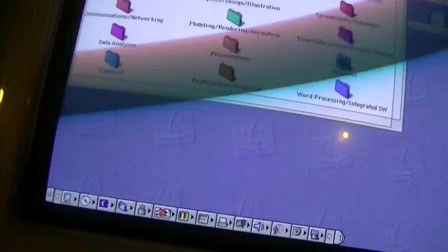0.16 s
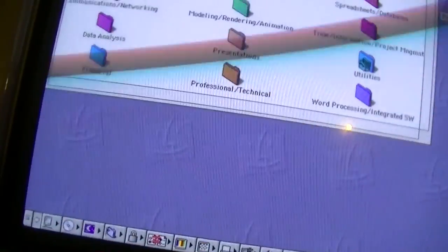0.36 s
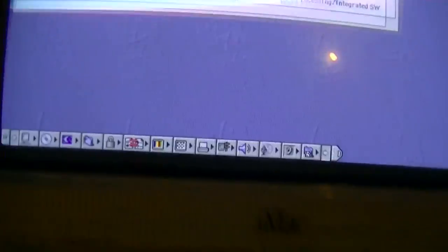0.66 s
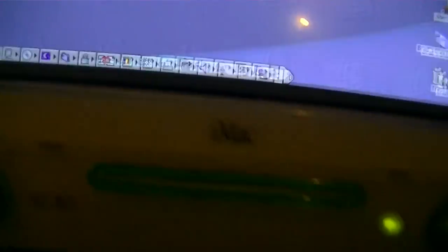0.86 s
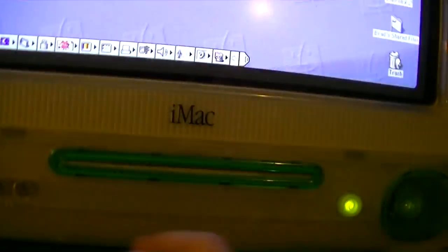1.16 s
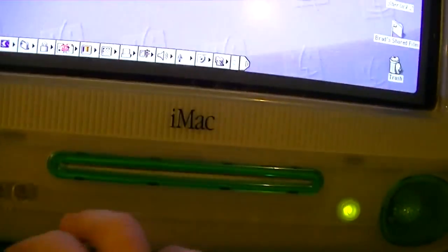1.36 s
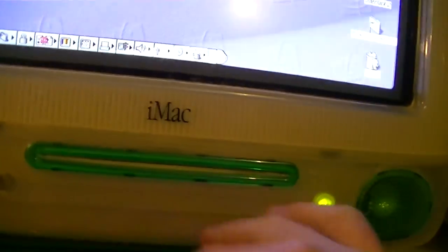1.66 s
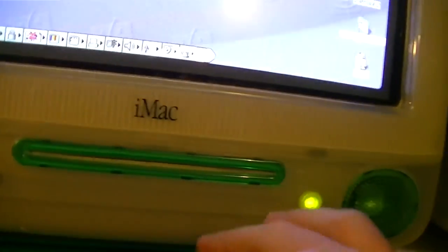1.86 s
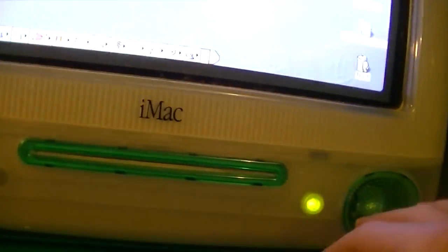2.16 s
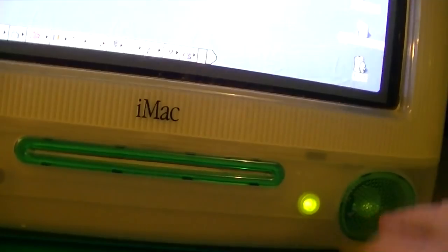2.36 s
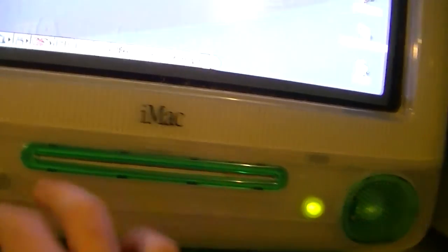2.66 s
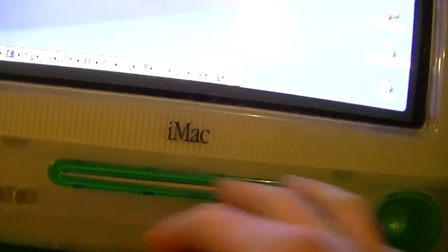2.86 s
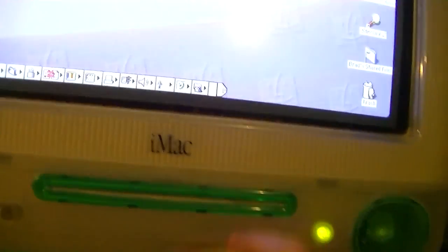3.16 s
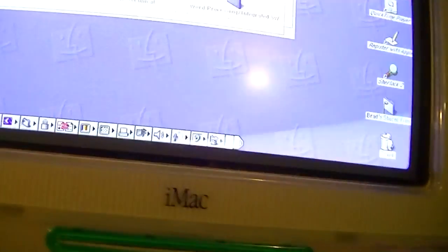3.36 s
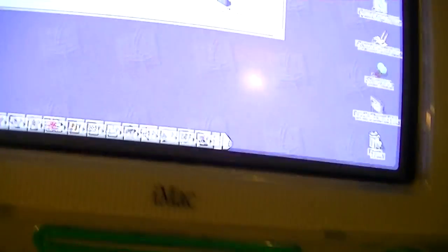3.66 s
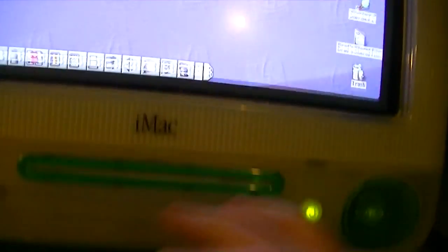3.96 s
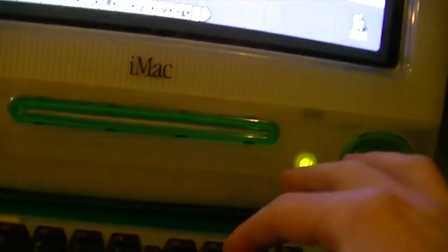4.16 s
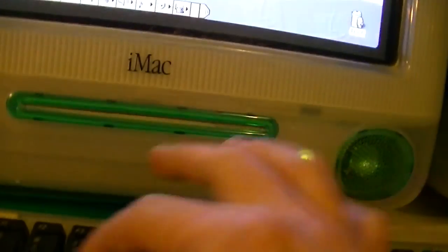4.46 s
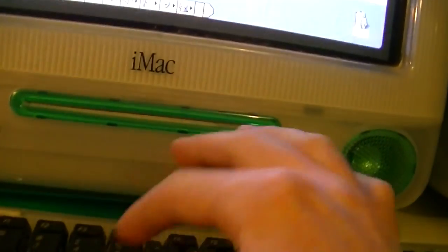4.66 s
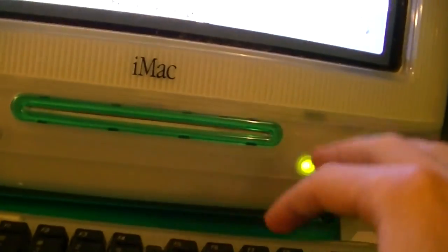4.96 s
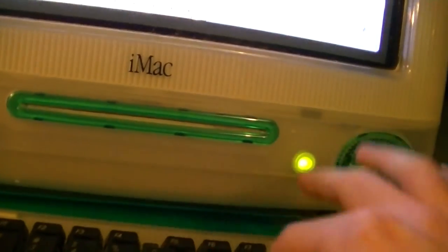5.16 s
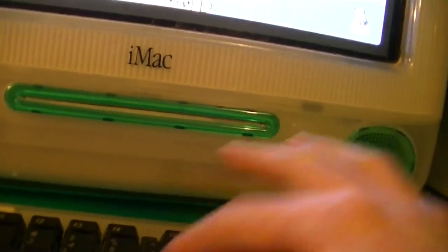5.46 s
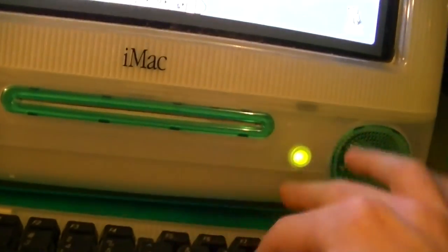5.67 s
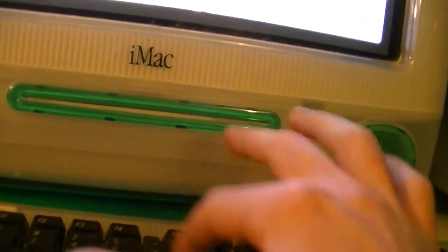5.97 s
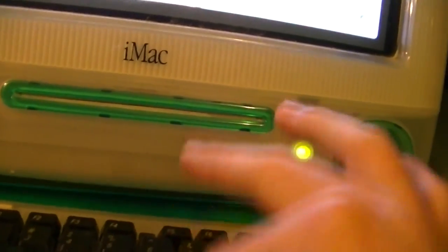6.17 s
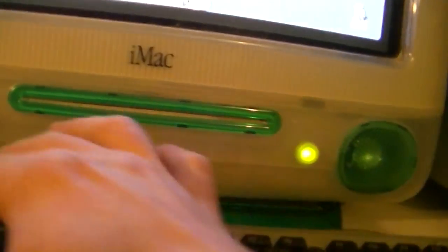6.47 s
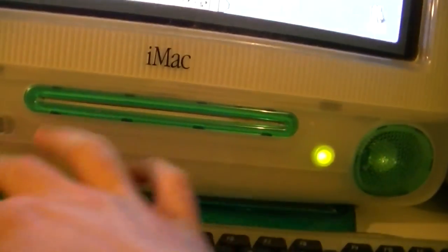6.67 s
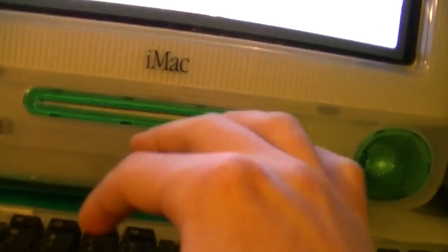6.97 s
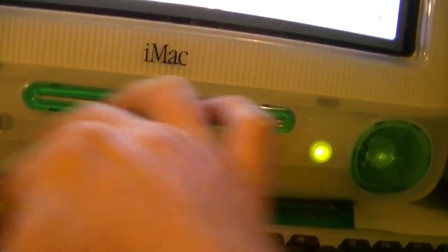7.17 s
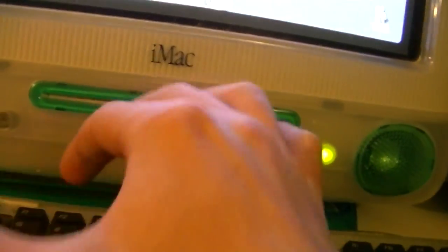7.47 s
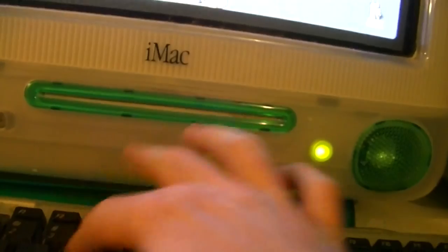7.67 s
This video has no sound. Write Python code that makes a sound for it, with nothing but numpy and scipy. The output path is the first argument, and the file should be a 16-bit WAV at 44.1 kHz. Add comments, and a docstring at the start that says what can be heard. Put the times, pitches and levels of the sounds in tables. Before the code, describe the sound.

A hand-held camera is knocked and brushed for the first half second, with a faint hollow hiss. After a pause one soft key click sounds, then louder single clicks, settling into steady one-handed typing at three or four keys a second. Each key clicks down and more softly back up. A soft airy rush and thin high drive whine continue beneath, in a quiet small room, microphone close.

```python
"""A quiet room: someone pecks at a desktop keyboard with one hand, close to a hand-held camera.
Each key clicks (damped cap modes, shaped noise), thumps case and desk (more modes), and clicks back up.
At first the moving camera is bumped and brushed: noise bursts, swelling noise and a gliding band of hiss.
Under it all are a soft rush of coloured noise and the high whine of a spinning drive, built of sines."""
import sys
import numpy as np
from scipy import signal
from scipy.fft import rfft, irfft, next_fast_len
from scipy.io import wavfile
from scipy.ndimage import map_coordinates

SR = 44100
rng = np.random.default_rng(int(sys.argv[2]) if len(sys.argv) > 2 else 0)


def digitize_waveform(pressure):
    """Quantize a signal to 16-bit integers and store it at the path in sys.argv[1].

    Rows of a 2-D input are taken as channels; values are limited to [-1, 1].
    """
    field = np.atleast_2d(pressure).T
    bounded = np.clip(field, -1, 1)
    quanta = np.round(bounded * 32767).astype(np.int16)
    wavfile.write(sys.argv[1], SR, quanta)


N = 344421

# keys going down: t/s, level/dB, cap pitch f/Hz, crack level/dB (relative),
# offset of the lighter contact t/s (negative: before), desk thump level/dB (before its trim)
KEY_PRESSES = [(1.3472, -32, 1370, -13.5, .015, -55), (2.3655, -22, 2200, -12.5, -.0038, -52.5),
               (2.6538, -24.5, 1050, -10, -0.0031, -47.5), (3.1442, -26, 1960, -13.5, .0046, -50),
               (3.5482, -22, 2450, -18.5, 0.00015, -53.5), (3.8345, -22, 1934, -19.5, 0.0023, -53),
               (4.2583, -22.5, 1700, -21, 0.0068, -55.5), (4.4988, -20.5, 2300, -12, -.003, -49),
               (4.7224, -19.5, 2525, -18, 0.0042, -49), (5.068, -17, 2060, -13.5, 0.0074, -50.5),
               (5.3299, -18.5, 2560, -16, -0.0033, -48.5), (5.5829, -24.5, 2550, -16, 0.0017, -51),
               (5.8121, -23.5, 2335, -19.5, .0042, -53), (5.961, -24, 1940, -15, 0.00069, -53.5),
               (6.1522, -20.5, 1872, -5, 0.005, -43.5), (6.5881, -20, 1600, -13, -0.00078, -43.5),
               (7.0278, -20.5, 1840, -18.5, 0.0082, -50), (7.2233, -17, 2060, -14, -0.0028, -44.5),
               (7.5784, -20, 2520, -11, -0.0037, -48)]
# colour of loose, rubbing key parts: f/Hz, relative level/dB per Hz
RATTLE_COLOUR = [(100, -45.5), (400, -5), (750, 1.5), (1800, 3.5), (2700, -3), (3600, -7), (4400, -9),
                 (5200, -16), (6500, -20), (8600, -20), (15000, -36)]
# balance inside a stroke, level/dB: ring of the cap, clack of the shell, rub of the stem
# a rising key rubs more
PRESS_TONE, RELEASE_TONE = (-5.5, -5, -25), (-5, -6, -18)


def amp(db):
    """Decibels to gain."""
    return 10 ** (np.asarray(db) / 20)


def unit(x):
    """Scale x to rms 1."""
    return x / np.sqrt(np.mean(x ** 2) + 1e-20)


def along(points, hz):
    """Read (f/Hz, value) points on a log frequency axis."""
    f, v = np.transpose(points)
    return np.interp(np.log(hz + 1), np.log(f + 1), v)


def curve(rows):
    """Turn (t/s, value) rows into one value per sample."""
    return np.interp(np.arange(N) / SR, *np.transpose(rows))


def wobble(rate):
    """Smooth random curve with rate knots a second, updated every 64 samples."""
    knots = rng.standard_normal(int(N * rate / SR) + 4)
    positions = np.arange(0, N + 64, 64) * rate / SR
    return map_coordinates(knots, [positions]).repeat(64)[:N]


def filtered(x, gain):
    """Filter a full-length sound with a gain that depends on frequency."""
    m = next_fast_len(N + SR // 2)
    spectrum = rfft(x, m) * gain(np.fft.rfftfreq(m, 1 / SR))
    return irfft(spectrum, m)[..., :N]


def coloured(x, colour):
    """Give a short sound a colour through a causal, minimum-phase filter."""
    n = 2 * len(x)
    gain = amp(along(colour, np.fft.rfftfreq(n, 1 / SR)))
    # folding the cepstrum forward in time makes the filter causal
    cepstrum = irfft(np.log(gain))
    cepstrum[1:n // 2] *= 2
    cepstrum[n // 2 + 1:] = 0
    return irfft(rfft(x, n) * np.exp(rfft(cepstrum)))[:len(x)]


def sized(x, span):
    """Scale a hit to the energy of rms 1 over span seconds."""
    return x * np.sqrt(span * SR / np.sum(x ** 2))


def burst(t, rise, t60):
    """Noise that swells quickly and dies away."""
    swell = 1 - np.exp(-t / rise)
    return rng.standard_normal(len(t)) * swell * amp(-60 * t / t60)


def ring(t, modes, rise, scatter_db, detune):
    """Damped modes (f/Hz, level/dB, t60/s), with new strengths and tunings at each strike."""
    out = np.zeros(len(t))
    for hz, db, t60 in modes:
        phase = 2 * np.pi * (hz * (1 + detune * rng.normal()) * t + rng.random())
        out += amp(db + scatter_db * rng.normal() - 60 * t / t60) * np.sin(phase)
    return out * (1 - np.exp(-(t / rise) ** 2))


def add(track, s, sound):
    """Mix a sound into the track at s seconds."""
    part = track[round(s * SR):][:len(sound)]
    part += sound[:len(part)]


def air(air_db=1.5):
    """A soft, nearly steady rush of noise, peaked by resonances of the housing."""
    # broad colour: f/Hz, relative level/dB per Hz
    air_colour = [(60, -30), (120, -20), (260, -11), (370, -8), (450, 0), (700, 1), (1000, 0), (1400, -2),
                  (2300, -7), (4600, -10), (6500, -18), (10500, -17), (12000, -25), (16000, -32)]
    # housing resonances: f/Hz, width f/Hz, boost level/dB
    housing = [(820.5, 140, 11.5), (1158, 65, 10), (1707, 160, 8.5), (8400, 3300, 9)]
    # slow drift: t/s, level/dB (before air_db)
    drift = [(0.0, -57.5), (3.55, -59), (7.81, -58.5)]

    def gain(hz):
        peaks_db = sum(db / (1 + (2 * (hz - centre) / width) ** 2) for centre, width, db in housing)
        return amp(along(air_colour, hz) + peaks_db)

    rush = unit(filtered(rng.standard_normal(N), gain))
    return amp(curve(drift) + air_db) * rush


def drive(whine_db=3, fade_db=3, buzz_db=-68, spread_db=7, spin_hz=70.62):
    """The drive's tones swell and fade as the camera moves through their standing waves."""
    # tones: f/Hz, level/dB with the camera at the screen, level/dB at the keys (both before whine_db)
    tones = [(1342, -73, -74), (1412, -75, -69), (2013, -68, -76), (2083, -69, -73), (2614, -68, -71),
             (2684, -75, -71), (3284, -79, -73), (3354, -67, -72), (4026, -69, -78), (4517, -76, -79),
             (4695, -76, -79), (7381, -82, -80), (8052, -70, -69), (8400, -78, -77), (8652, -71, -71),
             (8722, -69, -68), (8792, -80, -76), (9323, -75, -77), (9393, -73, -75), (9463, -73, -73),
             (10134, -81, -77), (10665, -85, -81)]
    t = np.arange(N) / SR
    lowered = curve([(2.2, 0), (4.3, 1)])  # camera position: 0 at the screen, 1 at the keys
    out = np.zeros(N)
    for hz, screen_db, keys_db in tones:
        fading = unit(amp(fade_db * wobble(1.98)))
        level = amp(whine_db + screen_db + (keys_db - screen_db) * lowered) * fading
        phase_drift = .5 * wobble(1.93)
        out += level * np.sin(2 * np.pi * (hz * t + rng.random()) + phase_drift)

    # the bearing adds a row of faint, narrow noise lines, one spin rate apart
    strength = amp(spread_db * np.clip(rng.standard_normal(SR), -1.5, 1.5))
    # f/Hz, relative level/dB
    colour = [(900, -31), (2200, 6), (4600, 1), (6000, 0), (8500, -14), (11500, -2.5), (15000, -18.5)]

    def lines(hz):
        comb = np.exp(-(hz % spin_hz - spin_hz / 2) ** 2)
        return comb * strength[(hz // spin_hz).astype(int)] * amp(along(colour, hz))

    buzz = unit(filtered(rng.standard_normal(N), lines))
    return out + amp(buzz_db) * buzz


def rub_envelope(attack_s=0.013, t60_s=0.12):
    """Each brush over the camera body swells, holds for its length and dies away."""
    # brushes: t/s, length t/s, level/dB
    rubs = [(0.18, 0.01, -50), (.308, 0.012, -48), (.35, 0.01, -44.5), (.386, 0.035, -39.5),
            (0.497, .035, -54.5), (.57, .13, -57.5)]
    t = np.arange(N) / SR
    out = np.zeros(N)
    for s, length, db in rubs:
        swell = np.clip(1 + (t - s) / attack_s, 0, 1) ** 2
        decay_db = -60 * np.maximum(t - s - length, 0) / t60_s
        out += amp(db + decay_db) * swell
    return out


def handling(swish_db=-0.5, width_hz=650):
    """Dull knocks on the camera, short noisy brushes across it and a gliding hollow hiss."""
    # knocks on the camera body: t/s, level/dB
    knocks = [(.165, -43), (.182, -41), (.298, -30), (.512, -45.5)]
    # colours of knock and brush: f/Hz, relative level/dB per Hz
    knock_colour = [(80, -16), (350, -12), (600, 4.5), (900, 3), (1500, -7), (3000, -11), (5000, -22),
                    (9000, -39), (15000, -40)]
    brush_colour = [(80, -41), (400, -14), (650, -0.5), (950, -4.5), (1130, 4), (1550, -8), (2600, -9.5),
                    (4500, -21.5), (9000, -32.5), (15000, -50)]
    # hiss while the hand shifts on the camera: t/s, centre f/Hz, level/dB (before swish_db)
    swish = [(0, 6800, -70), (.2, 6540, -64.5), (.45, 6100, -69), (.65, 6600, -63), (.8, 7650, -69),
             (1, 8400, -100)]
    out, t = np.zeros(N), np.arange(8192) / SR
    for s, db in knocks:
        knock = sized(coloured(burst(t, rise=0.00062, t60=0.04), knock_colour), 0.0035)
        add(out, s, amp(db) * knock)

    friction = unit(filtered(rng.standard_normal(N), lambda hz: amp(along(brush_colour, hz))))
    brush = rub_envelope() * friction

    # the gap between hand and microphone resonates: low noise shifted up to a gliding centre
    times, centre_hz, level_db = np.transpose(swish)
    band = filtered(rng.standard_normal(N), lambda hz: 1 / (1 + (hz / width_hz) ** 2))
    glide = np.cos(2 * np.pi * np.cumsum(curve(np.c_[times, centre_hz])) / SR)
    hollow = unit(band * glide)
    return out + brush + amp(curve(np.c_[times, level_db]) + swish_db) * hollow


def contact(s, db, pitch_hz, bright_db, tone, crack_db=-2.0):
    """The stem slides, then the cap rings a few cycles with a dry shell clack and a sharp crack."""
    # cap modes: multiple of its pitch, level/dB, t60/s
    cap_modes = [(.46, -15.5, 0.02), (.72, -6, 0.0074), (1, 2, 0.011), (1.34, -3, 0.0086),
                 (1.95, -29, 0.027)]
    # colours of shell and crack: f/Hz, relative level/dB per Hz
    shell_colour = [(60, -54), (300, -9.5), (700, -11), (1300, 2.5), (2600, 5), (3200, 3.5), (3750, -7),
                    (4400, -8), (5000, -20), (15000, -60.5)]
    crack_colour = [(1500, -14), (4400, 7), (5200, 3), (6800, -2.5), (8500, 4.5), (10300, -3.5),
                    (13500, -10), (14800, -33), (16000, -8)]
    ring_db, shell_db, stem_db = tone
    t = np.arange(2048) / SR
    modes = [(ratio * pitch_hz, level, t60) for ratio, level, t60 in cap_modes]
    cap = sized(ring(t, modes, rise=0.00046, scatter_db=0.5, detune=0.041), 0.0034)
    shell = sized(coloured(burst(t, rise=0.0015, t60=0.01), shell_colour), 0.0018)
    crack = sized(coloured(burst(t, rise=0.00032, t60=0.013), crack_colour), 0.0031)
    click = amp(ring_db) * cap + amp(shell_db) * shell + amp(crack_db + bright_db) * crack

    # the reversed burst makes the rubbing swell up to the moment of contact
    rubbing = burst(t, rise=0.00036, t60=0.026)[::-1]
    stem = sized(coloured(rubbing, RATTLE_COLOUR), 0.0019)
    start_s = s - len(t) / SR
    return start_s, amp(db) * np.concatenate([amp(stem_db) * stem, click])


def keycaps(release_crack_db=-16.5, lift_ahead_s=.0068, lift_db=-14.5, lift_ratio=1.1):
    """A tilted key meets its stop twice, down and up: one firm contact and a lighter one beside it."""
    # keys springing back: t/s, level/dB, cap pitch f/Hz, offset of the lighter contact t/s (negative: before)
    releases = [(1.4584, -30, 1350, -0.0032), (2.4378, -23, 2050, -.0094), (2.7305, -27.5, 1440, 0.0024),
                (3.2169, -27, 1634, -0.002), (3.6329, -26.5, 1990, -0.0063), (3.9103, -32.5, 2300, 0.0081),
                (4.3369, -25.5, 1846, 0.0015), (4.5776, -29, 2010, -0.0049), (4.7932, -29.5, 1990, 0.0078),
                (5.1539, -21, 2157, .003), (5.4093, -28.5, 2460, -0.00076), (5.669, -31, 1890, .0048),
                (5.8933, -27.5, 1920, -.016), (6.0427, -30, 1790, 0.0046), (6.2415, -23, 1720, 0.000041),
                (6.6647, -27, 1500, -0.0001), (7.1053, -24, 1950, 0.00058), (7.297, -28.5, 1490, 0.0014),
                (7.6501, -27.5, 2210, -0.0016)]
    # the lighter contact: relative level/dB, pitch ratio, extra crack level/dB
    press_lighter, release_lighter = (-6.5, 0.873, 0.68), (-3.5, 1.028, 1.3)
    out = np.zeros(N)

    def stroke(s, db, hz, crack_db, gap, tone, lighter):
        lighter_db, ratio, extra_db = lighter
        add(out, *contact(s, db, hz, crack_db, tone))
        add(out, *contact(s + gap, db + lighter_db, ratio * hz, crack_db + extra_db, tone))

    for s, db, hz, crack_db, gap, _ in KEY_PRESSES:
        stroke(s, db, hz, crack_db, gap, PRESS_TONE, press_lighter)
    for s, db, hz, gap in releases:
        stroke(s, db, hz, release_crack_db, gap, RELEASE_TONE, release_lighter)
        # the finger lifting off ticks just before the key tops out
        add(out, *contact(s - lift_ahead_s, db + lift_db, lift_ratio * hz, release_crack_db, RELEASE_TONE))
    return out


def keyboard_body(thump_db=-1.5, rattle_db=-50.5, usual_db=-50, rattle_grows=1.58):
    """A key hitting bottom swings case and desk; the harder the thump, the more other keys shake."""
    # case and desk top modes: f/Hz, level/dB, t60/s
    desk_modes = [(108, -14, .16), (126, -11, .16), (167, -14, .15), (205, -10, .13), (244, -8, .12),
                  (298, -1, .13), (325, -4, .11), (392, -4, .1), (418, 2, .12), (475, -1, .1),
                  (545, 0, .08), (625, 2, .09), (740, 2, .07)]
    out, t = np.zeros(N), np.arange(16384) / SR
    for s, *_, desk_db in KEY_PRESSES:
        desk = sized(ring(t, desk_modes, rise=0.0094, scatter_db=2.5, detune=0.014), 0.028)
        loose = sized(coloured(burst(t, rise=0.0011, t60=0.2), RATTLE_COLOUR), 0.072)
        loose_db = rattle_db + rattle_grows * (desk_db - usual_db)
        add(out, s, amp(desk_db + thump_db) * desk + amp(loose_db) * loose)
    return out


def room(x):
    """Screen, desk and walls answer differently for every stroke as hand and camera move."""
    # decay of the room: f/Hz, t60/s
    decay = [(150, 0.72), (1000, 0.18), (3000, 0.25), (10000, 0.17)]
    out = np.zeros(N)
    # a new answer starts 30 ms ahead of each press
    edges = [0] + [round((row[0] - .03) * SR) for row in KEY_PRESSES] + [N]
    for a, b in zip(edges, edges[1:]):
        hz, t, z = signal.stft(rng.standard_normal(SR // 2), SR, nperseg=256)
        faded = z * amp(-60 * t / along(decay, hz)[:, None])
        tail = signal.istft(faded, SR, nperseg=256)[1]
        near = burst(np.arange(len(tail)) / SR, rise=0.0018, t60=0.061)
        answer = amp(-12.5) * tail / np.linalg.norm(tail) + amp(-14.0) * near / np.linalg.norm(near)
        add(out, a / SR + .002, signal.fftconvolve(x[a:b], answer))
    return out


def space_bar(s=6.1527, ping_db=-38, knock_crack_db=-11):
    """The thumb touches the long key; its steel wire pings at the blow; let go, it wobbles to rest."""
    # wire modes: f/Hz, level/dB, t60/s
    wire_modes = [(11000, -7, .015), (14680, 0, .02), (14980, -2, .02)]
    out, t = np.zeros(N), np.arange(4096) / SR
    touch_ahead_s, touch_db, touch_hz = 0.0047, -36, 1290
    add(out, *contact(s - touch_ahead_s, touch_db, touch_hz, knock_crack_db, PRESS_TONE))
    ping = sized(ring(t, wire_modes, rise=.0003, scatter_db=3, detune=0.0024), 0.0023)
    add(out, s, amp(ping_db) * ping)

    # evenly spaced knocks on the wire after the key comes up, each weaker than the last
    first_s, first_db, pitch_hz = 6.256, -29, 1180
    gap_s, loss_db = 0.0092, 5.5
    for k in range(3):
        knock_db = first_db - k * loss_db
        add(out, *contact(first_s + k * gap_s, knock_db, pitch_hz, knock_crack_db, RELEASE_TONE))
    return out


def scene():
    """Two closely spaced microphones hear almost the same sound."""
    typing = keycaps() + space_bar() + keyboard_body() + handling()
    mid = typing + room(typing) + air() + drive()
    # the pair differs a little, most of all in the upper middle: f/Hz, level/dB
    spread = [(1400, -27), (3000, -23), (5000, -18), (9000, -22)]
    # 1j turns the difference a quarter cycle
    side = filtered(mid, lambda hz: 1j * amp(along(spread, hz)))
    return np.array([mid + side, mid - side])


def record(dry, low_cut_hz=135, top_hz=16000, hiss_db=-86, rumble_db=-106):
    """The camera cuts the deep bass, adds faint noise and keeps nothing above its band limit."""
    low_cut = signal.butter(5, low_cut_hz, "highpass", fs=SR, output="sos")
    hiss = amp(hiss_db) * rng.standard_normal((2, N))
    low_noise = filtered(rng.standard_normal((2, N)), lambda hz: 1 / (1 + (hz / 50) ** 2))
    rumble = amp(rumble_db) * unit(low_noise)
    return filtered(signal.sosfilt(low_cut, dry) + hiss + rumble, lambda hz: hz < top_hz)


dry = scene()
out = record(dry)
digitize_waveform(out)
```